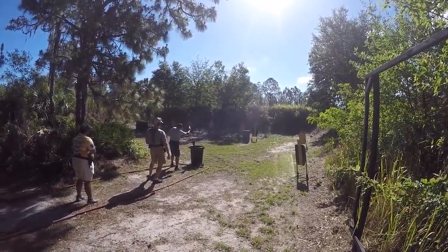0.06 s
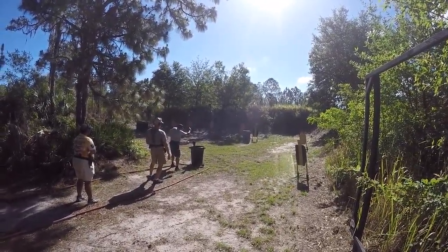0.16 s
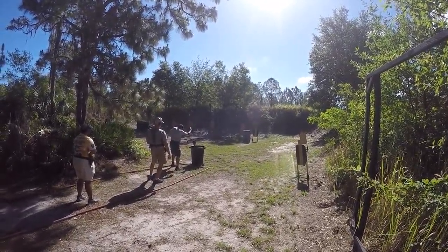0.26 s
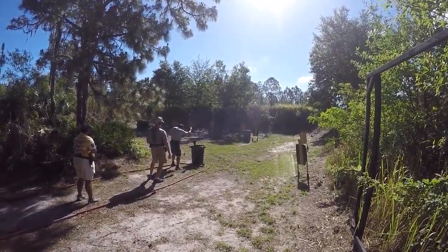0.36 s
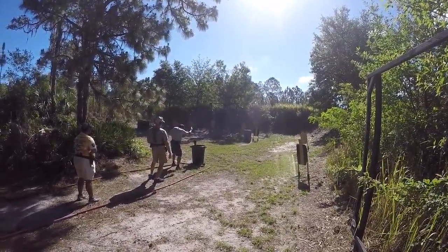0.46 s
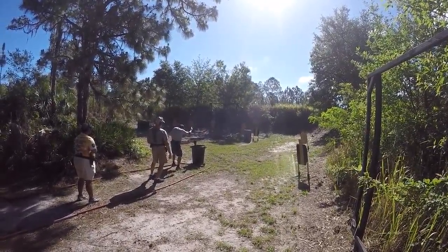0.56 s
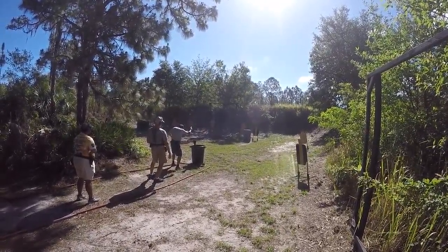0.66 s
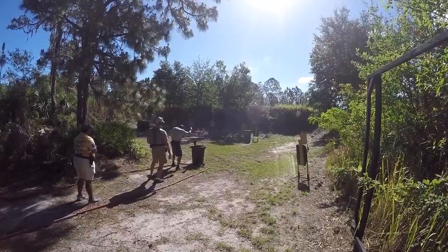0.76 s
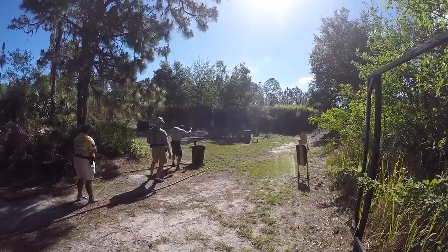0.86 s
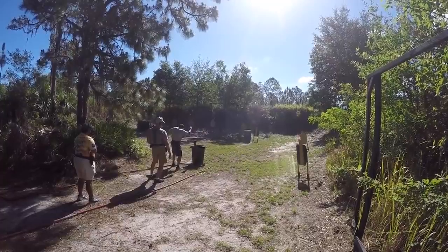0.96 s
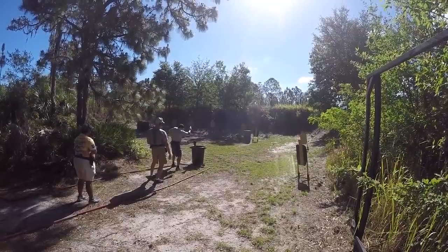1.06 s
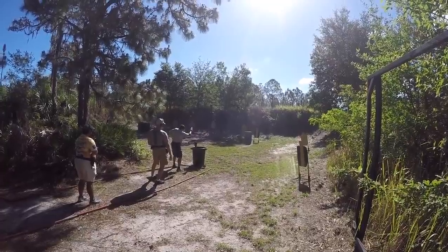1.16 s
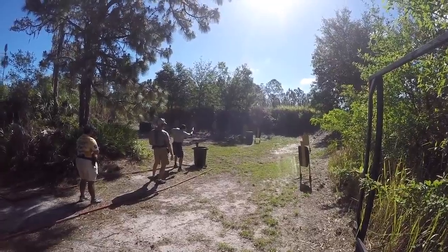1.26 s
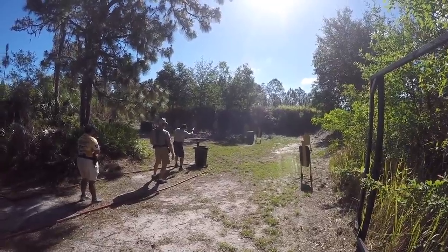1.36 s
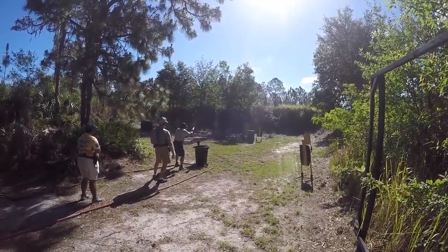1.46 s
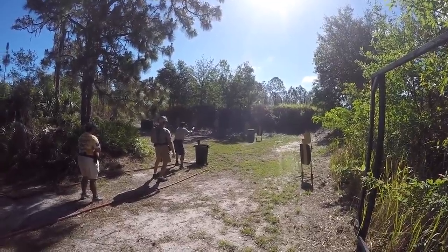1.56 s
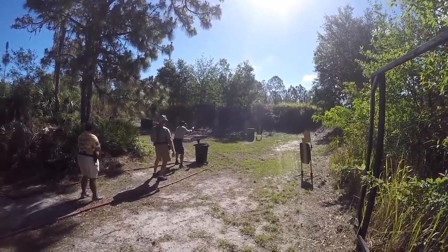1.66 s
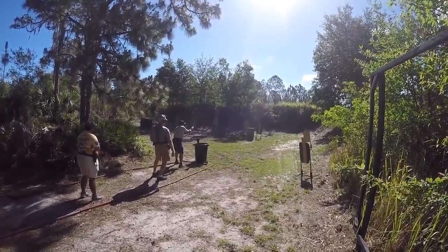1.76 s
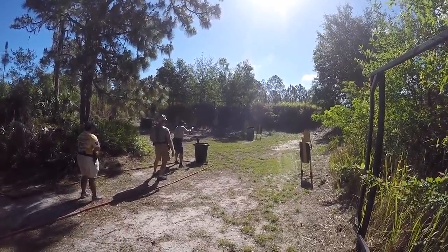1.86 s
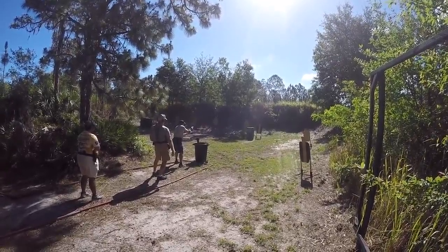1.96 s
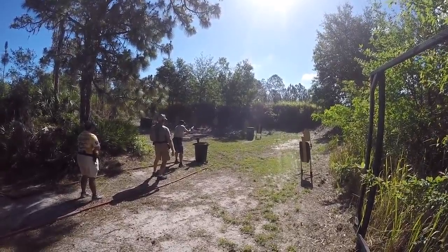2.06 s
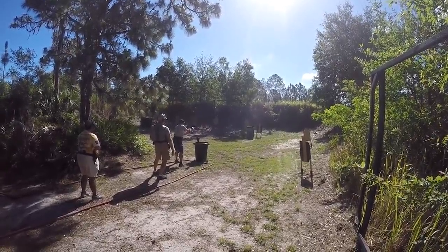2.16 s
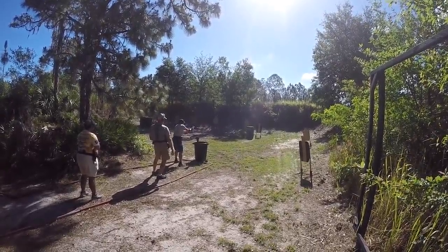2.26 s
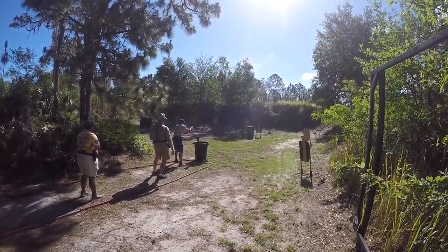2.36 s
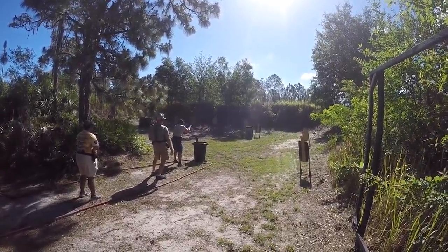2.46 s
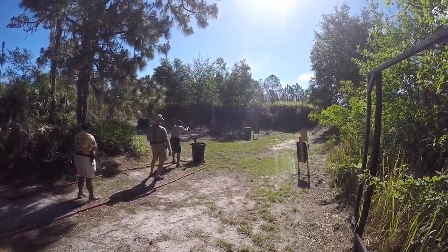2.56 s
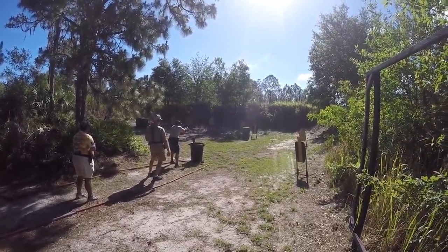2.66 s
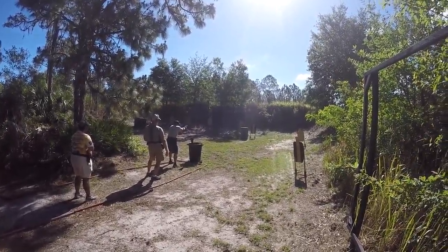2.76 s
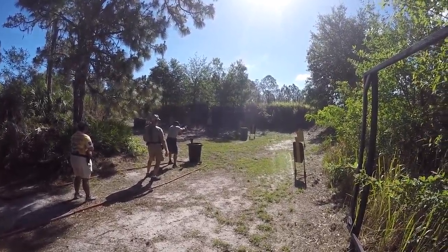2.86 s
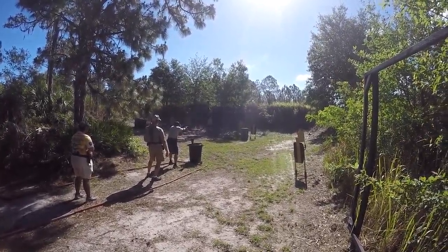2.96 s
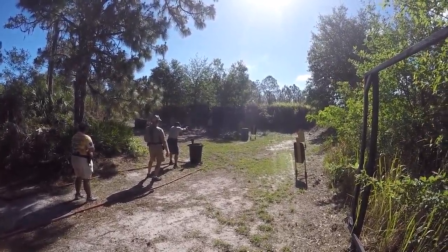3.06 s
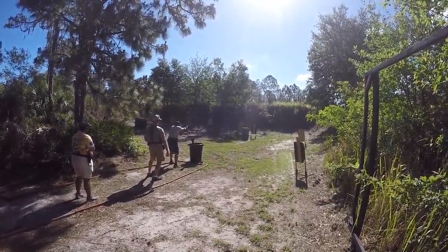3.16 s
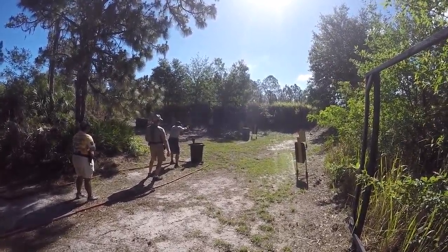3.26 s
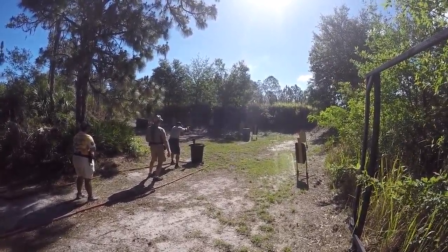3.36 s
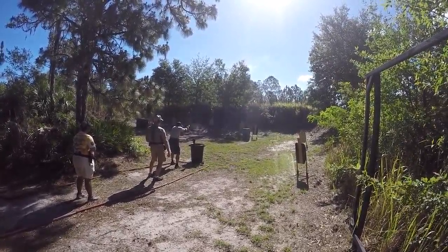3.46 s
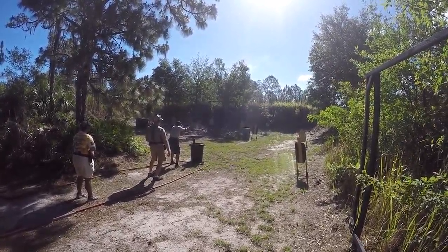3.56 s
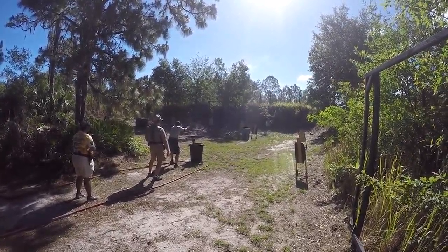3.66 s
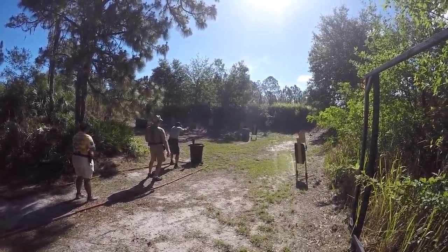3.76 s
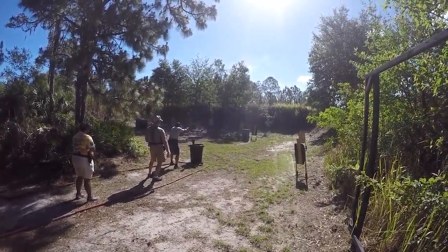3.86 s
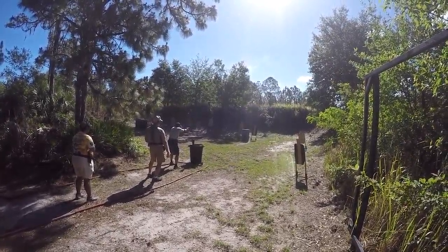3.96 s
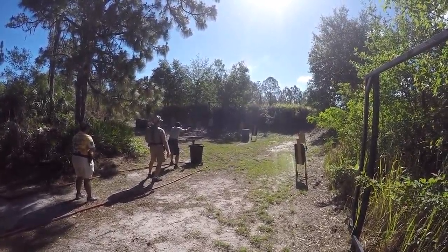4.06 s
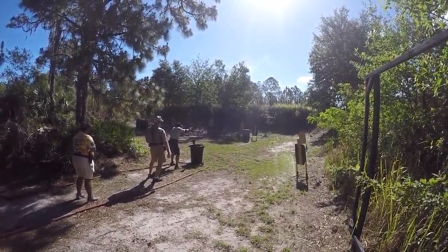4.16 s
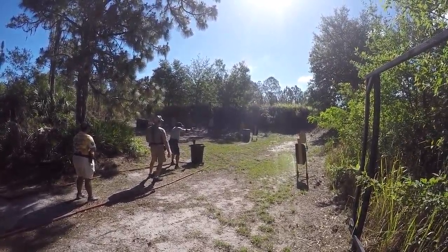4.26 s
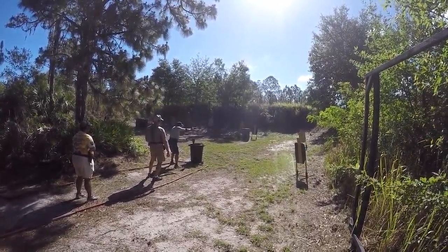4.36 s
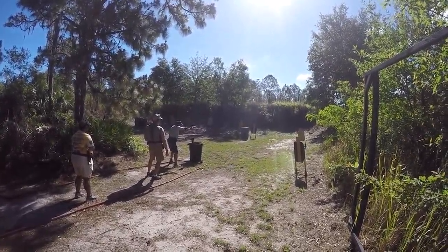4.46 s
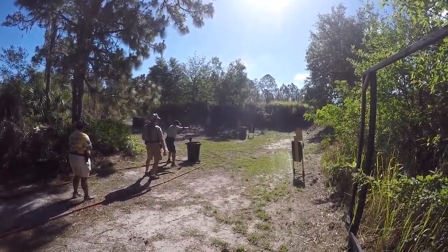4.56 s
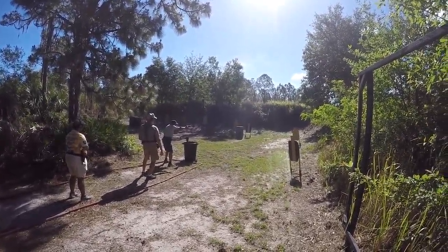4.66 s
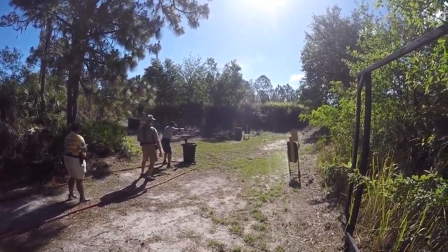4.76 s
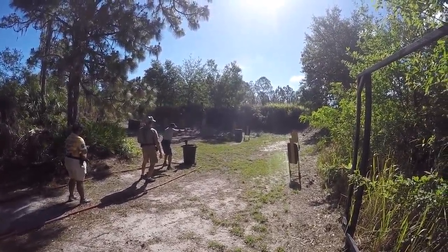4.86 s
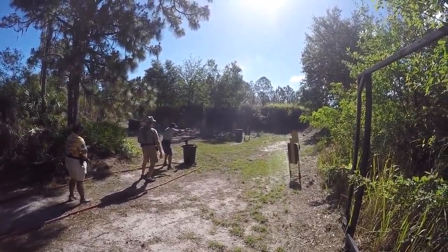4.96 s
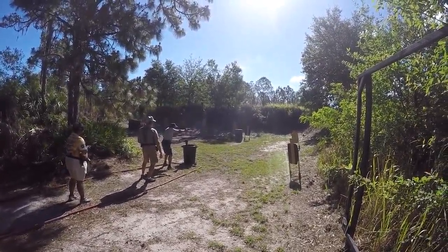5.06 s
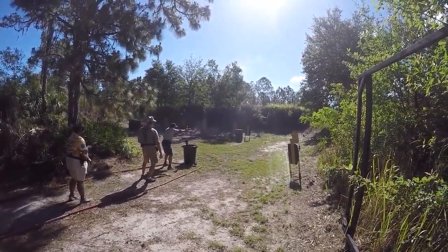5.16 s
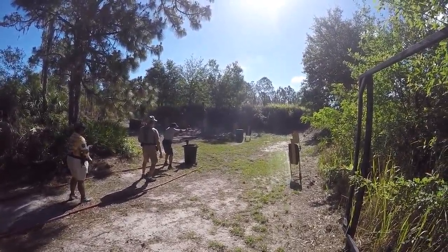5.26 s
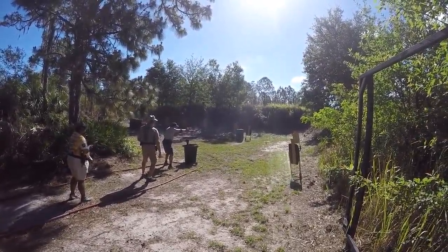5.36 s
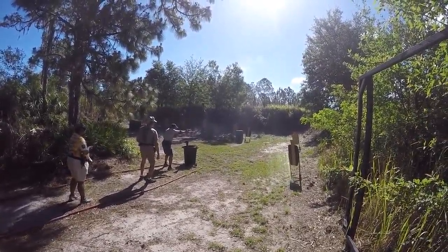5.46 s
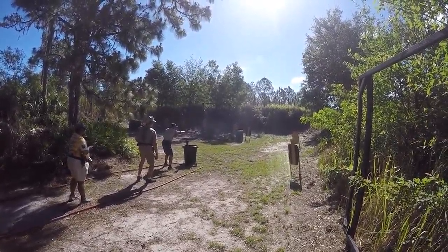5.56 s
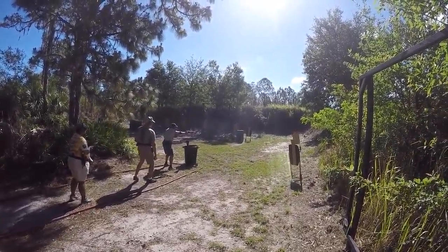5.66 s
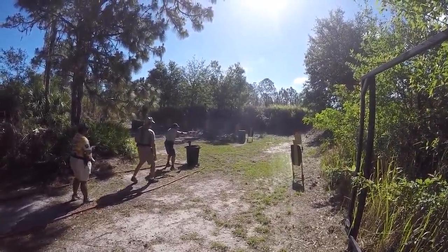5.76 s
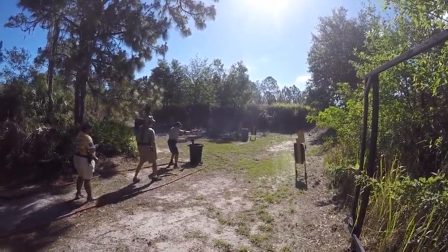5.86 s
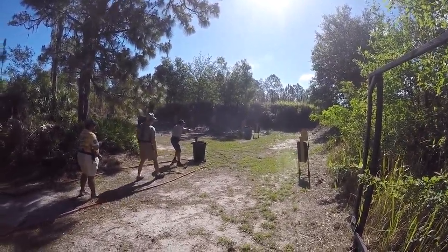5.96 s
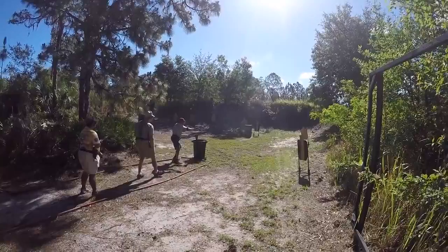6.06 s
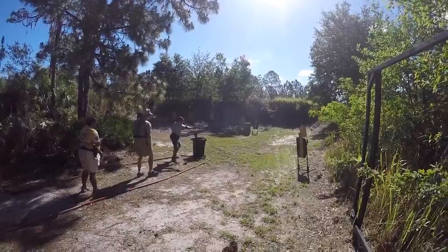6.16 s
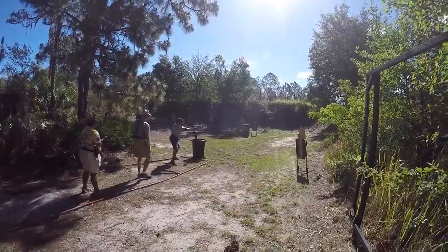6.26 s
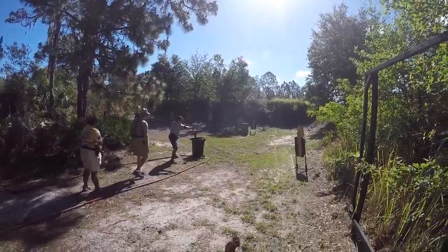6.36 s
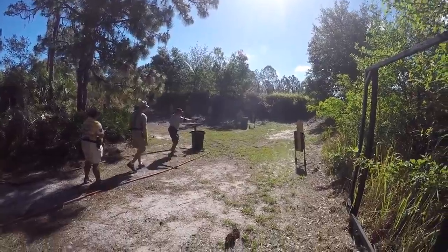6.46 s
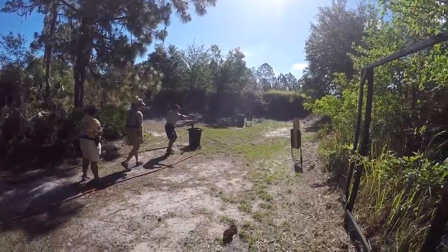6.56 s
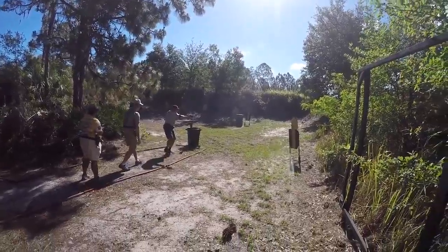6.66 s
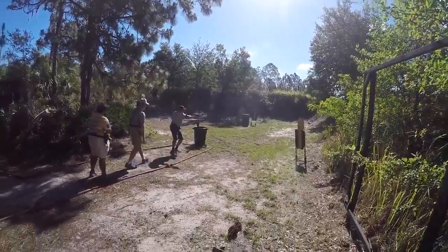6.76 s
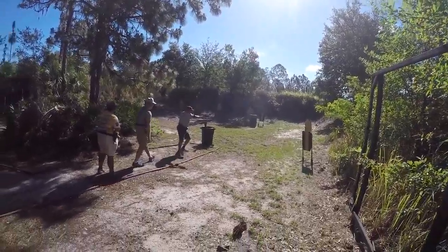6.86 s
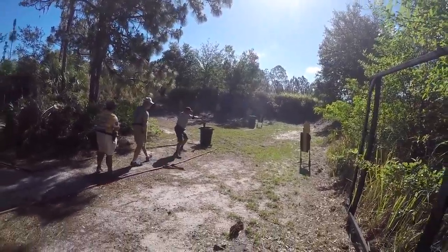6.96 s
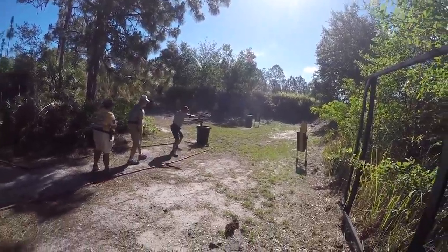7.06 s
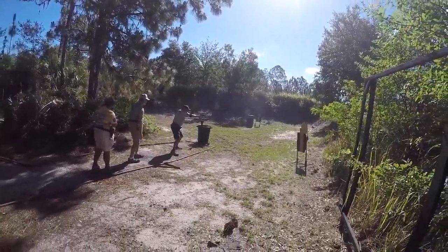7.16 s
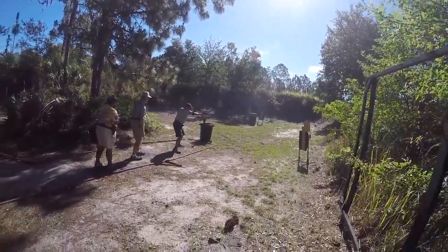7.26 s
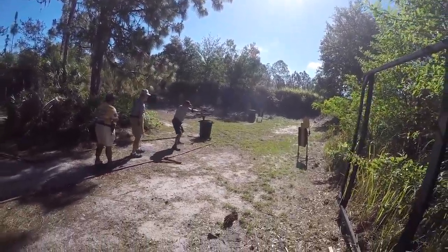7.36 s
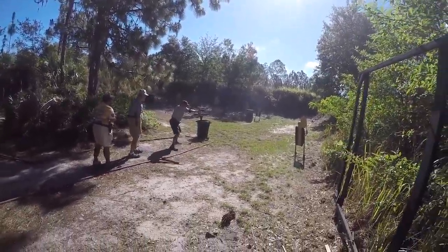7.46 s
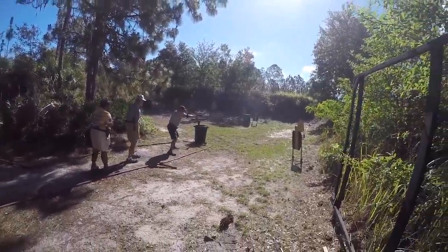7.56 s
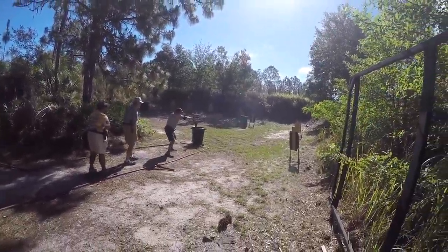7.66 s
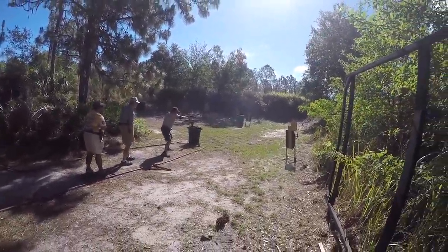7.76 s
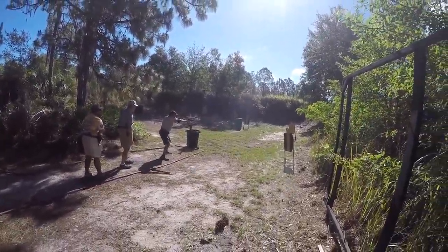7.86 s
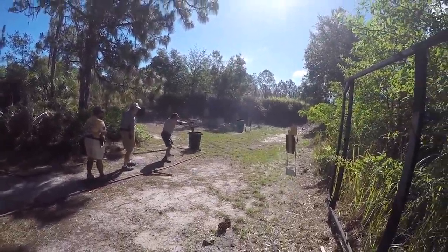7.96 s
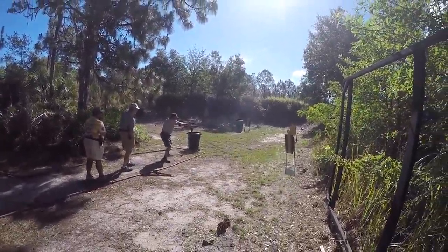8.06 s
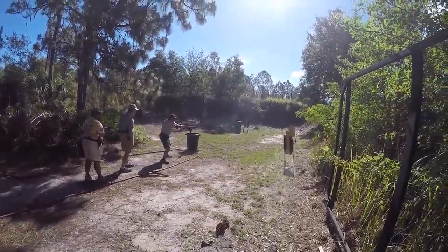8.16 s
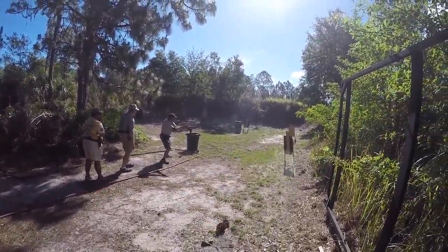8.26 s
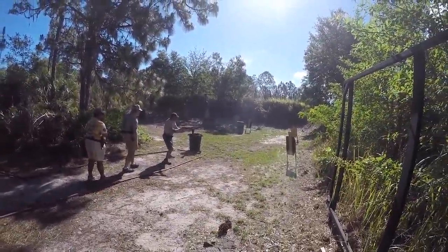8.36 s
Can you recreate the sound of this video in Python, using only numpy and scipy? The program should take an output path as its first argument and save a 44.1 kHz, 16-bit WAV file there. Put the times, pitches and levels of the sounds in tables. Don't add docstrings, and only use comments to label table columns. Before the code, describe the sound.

A worn, boxy microphone picks up soft low pulse knocks, air and hiss. Steel clicks: magazine seated, slide pulled, slide snapping forward. A single clipped gunshot scatters off nearby trunks and returns dull from distant trees. Three quick shots come later, then gritty footsteps and low jolts, then three more evenly spaced shots. After every blast the background dips and creeps back.

```python
import sys
import numpy as np
from scipy import signal
from scipy.fft import rfft, irfft
from scipy.io import wavfile
from scipy.ndimage import uniform_filter1d, map_coordinates

SR = 44100
rng = np.random.default_rng(int(sys.argv[2]) if len(sys.argv) > 2 else 0)


def transcribe(u):
    v = np.clip(np.atleast_2d(u).T, -1, 1)
    q = np.round(v * 32767).astype(np.int16)
    wavfile.write(sys.argv[1], SR, q)


def volts_from_db(level):
    exponent = np.asarray(level, float) / 20
    return 10 ** exponent


N = 370435

# f/Hz, level/dB
FLOOR = [(26, -26.5), (45, -6), (52, -11), (60, -19), (87, -24), (350, -35.5), (728, -38), (783, -39),
         (2030, -41), (2350, -42), (2790, -41), (10900, -51), (14000, -50), (15400, -58)]
# t/s, level/dB
PULSE = [(-.04, -37), (.282, -32.5), (0.754, -31.5), (1.211, -39.5), (1.686, -32), (2.15, -34), (2.6, -35),
         (3.062, -33.5), (3.511, -33), (3.962, -33.5), (4.41, -32), (4.86, -30), (5.32, -43.5),
         (5.75, -38.5), (7.86, -34.5), (8.239, -47)]
# t/s, level/dB, pitch f/Hz, width/s
JOLTS = [(4.78, -36, 25.93, 0.031), (5.96, -44.5, 28.7, 0.087), (6.13, -39.5, 28, .04),
         (6.234, -34, 30, 0.048), (6.321, -35.5, 28.6, .03), (6.412, -31.5, 25, 0.076),
         (6.592, -27, 24.6, 0.033), (6.701, -31, 26.6, 0.042), (6.81, -33, 25.7, 0.06),
         (6.962, -33, 22.4, 0.093), (7.111, -31.5, 27.2, 0.039), (7.26, -29.5, 25.5, 0.099),
         (7.449, -43, 28, 0.15)]
# f/Hz, level/dB
TREMOR = [(17, -40), (23, -3.5), (27, 0), (32, -6.5), (42, -40.5)]
# f/Hz, level/dB
RUB = [(30, -20), (45, -2.5), (60, 0), (90, -8.5), (160, -31), (500, -120)]
# t/s, peak level/dB, brightness/dB
PEBBLES = [(0.0497, -56, -16), (1.3394, -61, -13), (1.7707, -53, -17), (6.0753, -48, -33),
           (6.1187, -61.5, -20), (6.2148, -51.5, -2), (6.289, -55, -7), (6.339, -54, 4), (6.546, -55, -6),
           (6.9565, -43, -11), (7.0444, -55, -20), (7.1496, -42.5, -36)]
# f/Hz, width/Hz, boost/dB
HOUSING = [(1190, 670, 4.5), (1753, 150, 7), (2555, 130, 6), (3150, 350, 5), (4220, 300, 5.5),
           (10700, 350, 3)]
# f/Hz, width/Hz, boost/dB
DIFFUSE = [(1280, 100, 4), (1701, 220, 4), (2600, 1000, 1.7), (3180, 320, 3.3), (4000, 240, 6.2),
           (10800, 700, 3.8)]
# f/Hz, level/dB
METAL = [(350, -71.5), (600, -22), (890, -25), (1250, -13), (3470, -6), (6230, -10), (7850, -13),
         (13000, -22), (15500, -36.5)]
# t/s, peak level/dB, rise/s, fall by 60 dB/s, brightness/dB
MAGAZINE = [
    (0.571, -38, 0.0015, 0.037, -11.5),
    (0.5778, -35, 0.003, 0.058, -8),
    (0.7423, -51, 0.0015, 0.04, -2),
    (0.754, -51, 0.002, 0.03, -9),
    (0.7898, -50.5, 0.0018, 0.031, -16),
    (0.8695, -54, 0.0017, 0.028, -11),
    (1.804, -49.5, 0.002, 0.021, -11),
]
SLIDE_BACK = [
    (2.062, -53, 0.0028, 0.08, -7),
    (2.0772, -26, 0.00067, 0.022, -11),
]
SLIDE_HOME = [
    (2.2690, -41, 0.00075, 0.05, -15),
    (2.279, -43, 0.0065, 0.068, 6),
    (2.2893, -22.5, 0.0022, 0.034, -5.5),
]
# f/Hz, width/Hz, boost/dB
MAGAZINE_RING = [(2620, 290, 22), (3240, 270, 17.5), (4540, 570, 10), (5870, 90, 13), (6850, 110, 17),
                 (8470, 300, 18), (11350, 150, 10), (12700, 300, 13)]
BACK_RING = [(1200, 230, 11.5), (1850, 230, 18.6), (2500, 470, 15.5), (4010, 250, 13), (5110, 230, 5),
             (6800, 200, 5.7), (12300, 150, 12)]
HOME_RING = [(1270, 180, 5.9), (2500, 250, 12.7), (3490, 410, 13.4), (5500, 250, 5.9), (7670, 310, 14.4),
             (8720, 280, 12), (10600, 33, 18), (12600, 120, 7)]
FIRED = [3.5039, 4.8409, 5.1541, 5.4434, 7.3756, 7.6734, 7.9607]
STAND_OF_SHOT = [0, 1, 1, 1, 2, 2, 2]
# blast level/dB, thump level/dB, near scatter level/dB, tree-line level/dB
SHOTS = [(15.7, -19, -11.5, -49), (19.7, -13.5, -12.5, -57), (12.5, -25.5, -15, -57), (8, -19, -15, -55.5),
         (23.27, -12.5, -14, -68), (13.37, -24, -18.5, -64), (13, -26, -17, -62)]
# t/s after the blast, level/dB
EARLY = [
    [(0, -13), (.0003, -4), (.0013, 0.5), (.0021, 5.5), (.0036, -9), (.0053, -5.5), (.008, -13)],
    [(0, -1.5), (.0003, -6), (.0015, 8), (.0022, 7.5), (.0035, -13), (.0052, -7), (.008, -14.5)],
    [(0, -3), (.0004, -4), (.0016, 4.5), (.0024, 0), (.0038, -13.5), (.0053, -10.5), (.007, -13)],
]
# f/Hz, width/Hz, boost/dB
BEARING = [
    [(1250, 780, 5.5), (1720, 150, 8.5), (690, 230, 8), (2500, 300, 4.5), (3400, 250, 8)],
    [(1196, 170, 17.5), (1783, 200, 11), (2770, 160, 7), (3240, 210, 7)],
    [(1213, 170, 13), (1622, 200, 9.5), (2600, 280, 9.5), (423, 250, 4.5), (1000, 180, 4), (3243, 430, 3)],
]
# t/s after the blast, level/dB over scatter, centre f/Hz
SLAPS = [
    [(.0115, -5, 3076), (.047, -10.5, 2600), (.055, -8.5, 3610), (.055, -14, 919.3), (.088, -14.5, 867),
     (.088, -10.5, 2500)],
    [(.026, -10.5, 2973), (.05, -14, 2895), (.058, -14, 2600), (.058, -15, 1000), (.09, -16.5, 816),
     (.088, -14, 2600)],
    [(.012, 1, 2700), (.022, -4.5, 3750), (.039, -11, 2600), (.039, -17, 1103), (.093, -19, 2610),
     (.1, -24.5, 948)],
]
LINGER_DB = [4, 1.5, 0.04]
# f/Hz, level/dB
BLAST = [(150, -49.5), (400, -13), (700, -10), (1500, -6), (2700, -3), (4300, -8.5), (8700, -12),
         (12000, -28), (16000, -48)]
# f/Hz, level/dB
NEAR = [(24, -40), (40, -16), (91, -15.5), (269, -15.5), (381, -13.5), (829, -9.5), (2100, -6.5),
        (2560, -2), (3640, -7), (10700, -21), (14800, -35.5), (16000, -57.5)]
# f/Hz, level/dB
BOOM = [(30, -29.5), (60, 1.5), (120, -1), (220, -9.5), (400, -40.5)]
# f/Hz, level/dB
FAR = [(180, -64), (300, -30), (530, -12.5), (1320, -11), (1420, -12.5), (2470, -3), (2880, -10),
       (4110, -12.5), (9000, -32), (11700, -65.5), (19800, -120)]
# start t/s, peak level/dB, rise/s, fall/dB per s, tread level/dB over the rush
STROKES = [
    (5.98, -73.5, 0.11, 20, -5),
    (6.17, -63.5, .04, 89, -3),
    (6.26, -61.5, 0.075, 70, -3),
    (6.47, -52, .13, 51, -11),
    (6.56, -58, 0.11, 13, -4),
    (6.9, -56, 0.05, 59.5, -6),
    (7.0, -59, 0.044, 70.5, -4),
    (7.22, -59, 0.11, 198.5, -7.5),
]
# f/Hz, level/dB
SAND = [(290, -40), (500, -21.5), (803, -13), (1270, -1), (1450, -15.5), (1670, -4), (3060, 3.5),
        (4640, -7), (10800, -14.5), (15500, -27)]
# f/Hz, level/dB
GRIT = [(2590, -33.5), (4400, -2.5), (4640, -1), (6110, 2), (7300, -2.5), (10800, -5), (13200, -10),
        (15300, -10)]


def unit(x):
    return x / np.sqrt(np.mean(x ** 2) + 1e-20)


def wobble(rate):
    knots = rng.standard_normal(int(N * rate / SR) + 4)
    return map_coordinates(knots, [np.arange(N) * rate / SR])


def coloured(x, spectrum, modes=()):
    size = 8192
    hz = np.fft.rfftfreq(size, 1 / SR)
    f, db = np.transpose(spectrum)
    gain = volts_from_db(np.interp(np.log(hz + 1), np.log(f + 1), db))
    for centre_hz, width_hz, boost_db in modes:
        gain = gain * volts_from_db(boost_db / (1 + (2 * (hz - centre_hz) / width_hz) ** 2))
    cepstrum = irfft(np.log(gain + 1e-6))
    fold = np.r_[1, np.full(size // 2 - 1, 2), 1, np.zeros(size // 2 - 1)]
    response = irfft(np.exp(rfft(cepstrum * fold)))[:size // 2]
    return signal.fftconvolve(x, response / np.linalg.norm(response))[:len(x)]


def add(track, s, sound):
    part = track[round(s * SR):][:len(sound)]
    part += sound[:len(part)]


def lumpy(count, depth_db, span):
    lumps = unit(uniform_filter1d(rng.standard_normal(count), int(span * SR)))
    return unit(volts_from_db(depth_db * lumps) * rng.standard_normal(count))


def ducking(drop_db, most_db, attack, release):
    after = np.clip(np.arange(N) / SR - np.array(FIRED)[:, None], 0, None)
    pulls = (1 - np.exp(-after / attack)) * np.exp(-(after / release) ** 2)
    pull_db = drop_db * np.sum(pulls, axis=0)
    return volts_from_db(-most_db * np.tanh(pull_db / most_db))


def air_and_hiss():
    gain = ducking(drop_db=8.5, most_db=13.5, attack=.05, release=0.6)
    noise = coloured(rng.standard_normal(N), FLOOR, [(9800, 160, 1.8), (14400, 300, 3)])
    air = signal.sosfilt(signal.butter(2, 700, fs=SR, output="sos"), noise)
    hiss = noise - air
    return volts_from_db(-56.5 + .4 * wobble(3)) * (air * gain ** 1.6 + hiss * gain)


def body_shaking():
    gain = ducking(drop_db=6, most_db=16, attack=.05, release=.8)
    shakes = [(s, db, hz, width, width) for s, db, hz, width in JOLTS]
    for first_s, first_db in PULSE:
        for s, db in [(first_s, first_db), (first_s + .175, first_db - 8)]:
            ducked_db = 20 * np.log10(gain[round(abs(s) * SR) % N])
            shakes.append((s, db + ducked_db, 26.4, .03, .03))
    padded = np.zeros(N + SR)
    t = np.arange(-SR // 4, SR // 4) / SR
    for s, db, hz, rise, fall in shakes:
        swell = np.exp(-(t / np.where(t < 0, rise, fall)) ** 2)
        add(padded, s + .25, volts_from_db(db + 3) * swell * np.sin(2 * np.pi * (hz * t + rng.random())))
    shake = padded[SR // 2:][:N]
    rub = uniform_filter1d(np.abs(shake), size=4000) * coloured(rng.standard_normal(N), RUB)
    hz, level_db = np.transpose(TREMOR)
    shape = volts_from_db(np.interp(np.fft.rfftfreq(N, 1 / SR), hz, level_db, -120, -120))
    tremor = unit(irfft(rfft(rng.standard_normal(N)) * shape, N))
    return shake + volts_from_db(-26) * rub + volts_from_db(-48) * gain * tremor


def clicks(table, modes, scatter_db):
    out, t = np.zeros(N), np.arange(SR // 3) / SR
    blurred = [(hz, 1.9 * width, 0.56 * boost_db) for hz, width, boost_db in modes]
    for s, db, rise, t60, bright_db in table:
        tilt = [(hz, level + (bright_db + 8.5) * (hz > 5000)) for hz, level in METAL]
        brighter = [(hz, level + 4 * (hz > 9000)) for hz, level in tilt]
        start = 1 - np.exp(-t / rise)
        knocks = start * volts_from_db(-60 * t / t60) * lumpy(len(t), depth_db=5.5, span=0.0012)
        rattle = coloured(knocks, tilt, modes)
        fading = start * volts_from_db(scatter_db - 60 * t / 0.27) * rng.standard_normal(len(t))
        answer = coloured(fading, brighter, blurred)
        add(out, s, volts_from_db(db + 2.5) * (rattle + answer))
    return out


def pebbles():
    knocks = [(s, db, .001, .019, bright_db) for s, db, bright_db in PEBBLES]
    return clicks(knocks, HOUSING, scatter_db=-23.5)


def pistol_handling():
    magazine = clicks(MAGAZINE, MAGAZINE_RING, scatter_db=-18)
    slide_back = clicks(SLIDE_BACK, BACK_RING, scatter_db=-23.5)
    return magazine + slide_back + clicks(SLIDE_HOME, HOME_RING, scatter_db=-22.0)


def slaps(table, count):
    out, t = np.zeros(count), np.arange(SR // 80) / SR
    for s, db, hz in table:
        swell = np.exp(-((t - .005) / .0025) ** 2)
        burst = swell * (.2 * np.sin(2 * np.pi * hz * t) + rng.standard_normal(len(t)))
        colour = [(hz / 4, -40), (hz / 1.6, -8), (hz, 0), (hz * 1.7, -8), (hz * 5, -32), (hz * 9, -60)]
        add(out, s - .005, volts_from_db(db - 3) * coloured(burst, colour))
    return out


def firing_point(early, bearing, table, count):
    arrivals = np.zeros(count)
    for s, db in early:
        arrivals[round(s * SR)] += volts_from_db(db)
    blast = coloured(arrivals, BLAST, bearing)
    return blast, slaps(table, count), lumpy(count, depth_db=1.5, span=0.0024)


def near_scatter(t, linger_db):
    ground_s, linger_s = .003, .16
    ground = volts_from_db(11.5) * np.exp(-((t - ground_s) / .0013) ** 2)
    decays = np.hypot(volts_from_db(2 - 60 * t / .1), volts_from_db(-4 - 60 * t / .31))
    held = t / linger_s * np.exp(1 - t / linger_s)
    return np.hypot(ground, decays * (1 - np.exp(-t / ground_s))) * volts_from_db(linger_db * held)


def tree_line(t):
    return_s = .31
    before, after = np.clip(return_s - t, 0, None), np.clip(t - return_s, 0, None)
    decays = np.hypot(volts_from_db(-3 - 60 * after / 1), volts_from_db(-7.5 - 60 * after / 2.9))
    return volts_from_db(-649 * before ** 2) * decays * (t > .1)


def shots():
    count = 3 * SR // 2
    t = np.arange(count) / SR
    spots = [firing_point(*spot, count=count) for spot in zip(EARLY, BEARING, SLAPS)]
    thump = np.sin(2 * np.pi * 150 * t) * volts_from_db(-60 * t / 0.018)
    grab = volts_from_db(-5 * np.clip((t - .004) / 0.0015, 0, 1))
    out = np.zeros(N)
    for s, spot, (blast_db, thump_db, near_db, far_db) in zip(FIRED, STAND_OF_SHOT, SHOTS):
        blast, echoes, place = spots[spot]
        direct = volts_from_db(blast_db) * grab * blast + volts_from_db(thump_db + 13.0) * thump
        trees = unit(1.6 * place + lumpy(count, depth_db=1.2, span=.005))
        near = coloured(trees * near_scatter(t, LINGER_DB[spot]), NEAR, HOUSING) + echoes
        roll = coloured(rng.standard_normal(count) * volts_from_db(-38 - 60 * (t / 0.27) ** 4), BOOM)
        far = lumpy(count, depth_db=1.9, span=0.0073) * volts_from_db(far_db) * tree_line(t)
        add(out, s, direct + volts_from_db(near_db) * (near + roll) + coloured(far, FAR, DIFFUSE))
    return out


def strokes():
    s, db, rise, fall_db, tread_db = np.transpose(STROKES)[:, :, None]
    t = np.arange(N) / SR - s
    swell = np.sin(np.pi / 2 * np.clip(t / rise, 0, 1)) ** 2
    rush = swell * volts_from_db(db - fall_db * np.clip(t - rise, 0, None))
    return np.linalg.norm(rush, axis=0), np.linalg.norm(rush * volts_from_db(tread_db), axis=0)


def sand_band(low_hz, high_hz):
    inside = [point for point in SAND if low_hz <= point[0] <= high_hz]
    return [(low_hz / 1.5, -50)] + inside + [(high_hz * 1.3, -50)]


def grains(colour, span):
    patches = volts_from_db(1.6 * wobble(30))
    return patches * coloured(lumpy(N, depth_db=2.0, span=span), colour, DIFFUSE)


def scuffing():
    rush, weight = strokes()
    tread = weight * grains(sand_band(480, 1800), span=.008)
    sand = grains(sand_band(1600, 5000), span=.0041)
    return tread + rush * (sand + volts_from_db(-3) * grains(GRIT, span=.0018))


def scene():
    background = air_and_hiss() + body_shaking()
    feet = pebbles() + scuffing()
    return (background + feet + pistol_handling() + shots())[None]


def top_cut(x):
    return signal.sosfilt(signal.butter(12, 16100, fs=SR, output="sos"), x)


def record(dry):
    clipped = dry / (1 + np.abs(dry / .93) ** 4) ** (1 / 4)
    hz = np.fft.rfftfreq(N, 1 / SR)
    banded = irfft(rfft(clipped) * volts_from_db(-35 * np.clip((hz - 15150) / 700, 0, 3)), N)
    return top_cut(banded)


dry = scene()
out = record(dry)
transcribe(out)
```